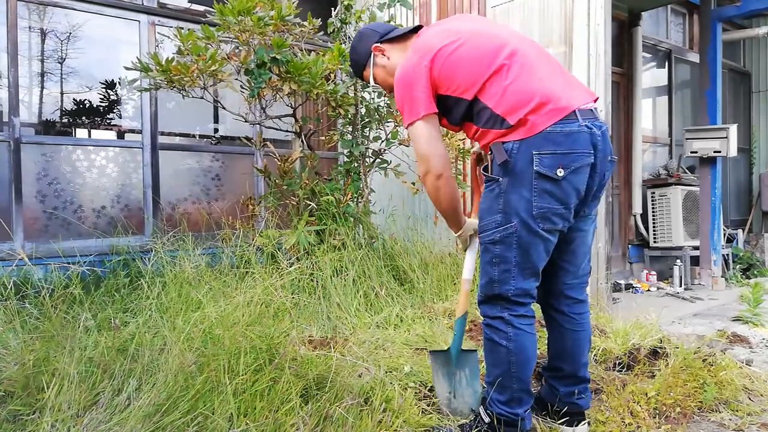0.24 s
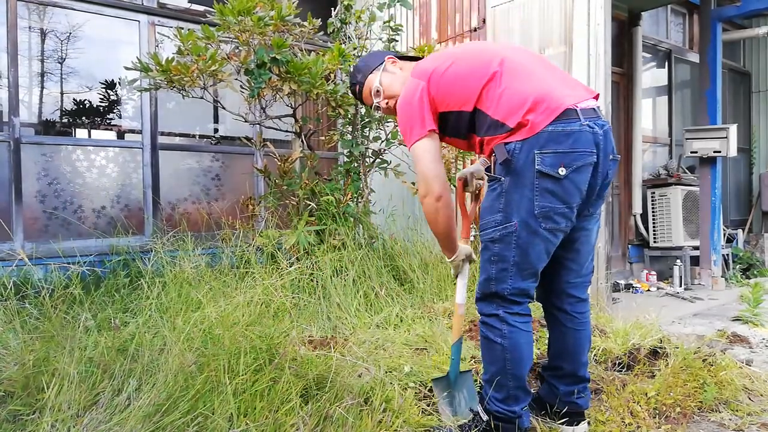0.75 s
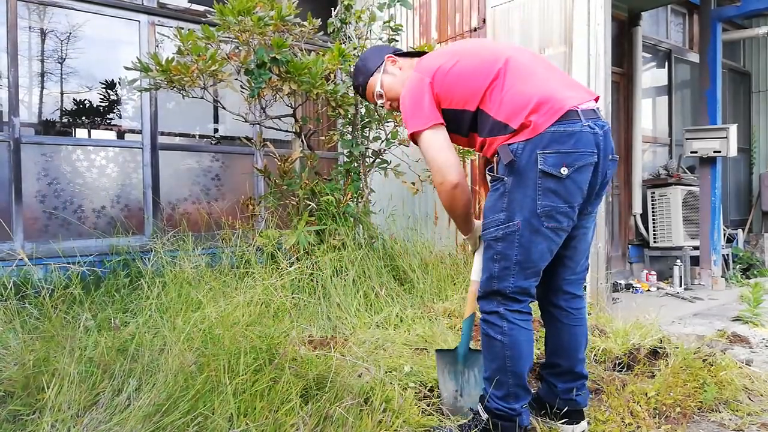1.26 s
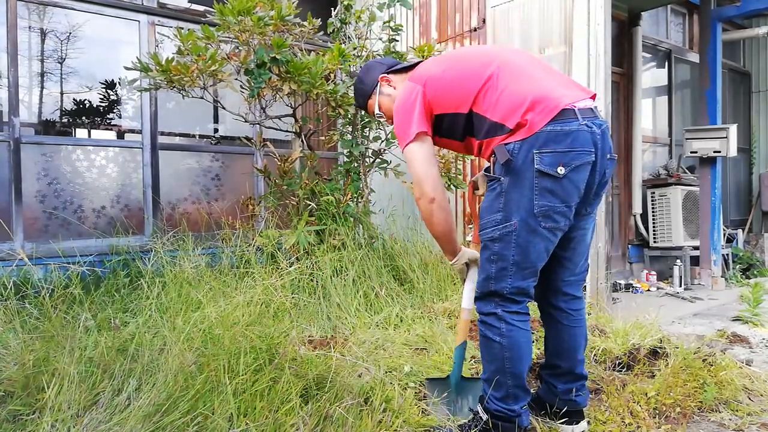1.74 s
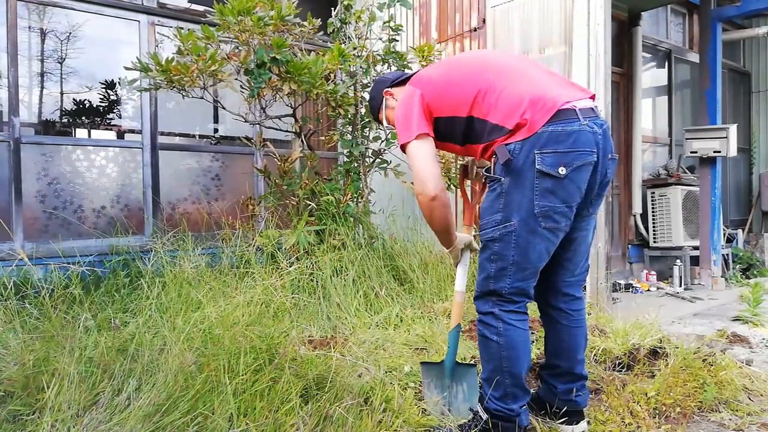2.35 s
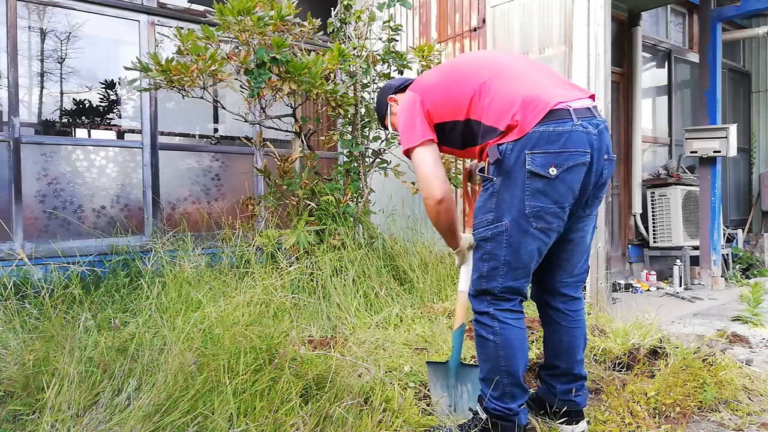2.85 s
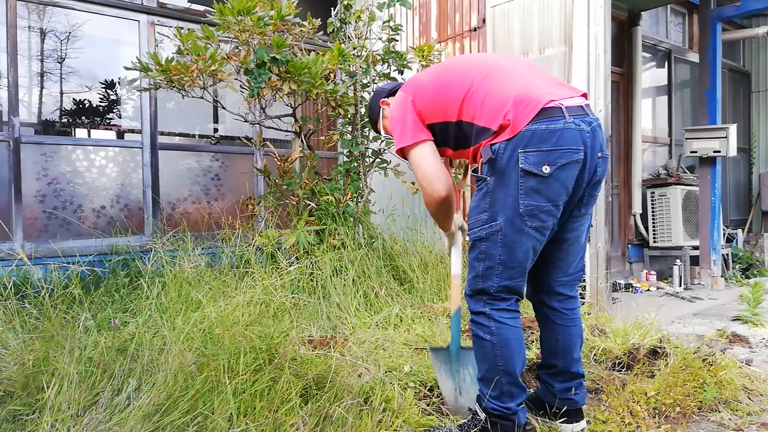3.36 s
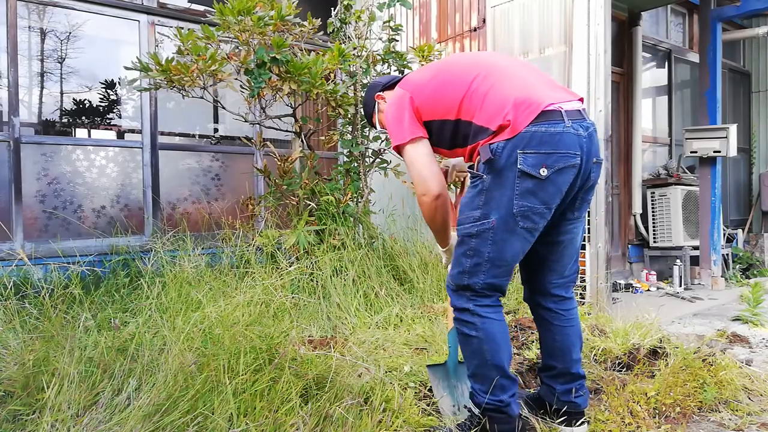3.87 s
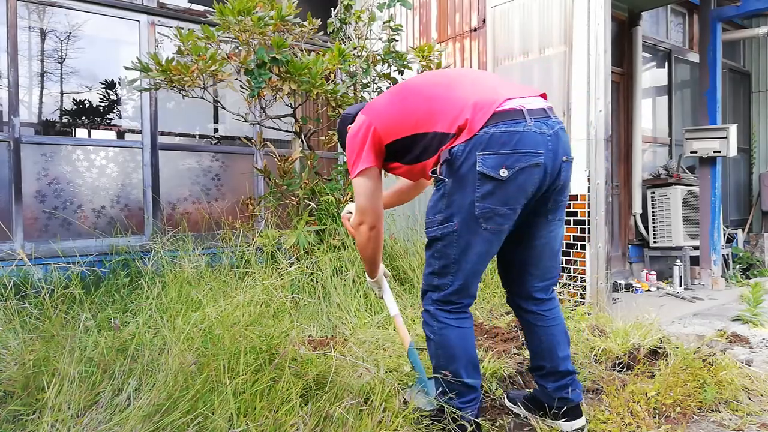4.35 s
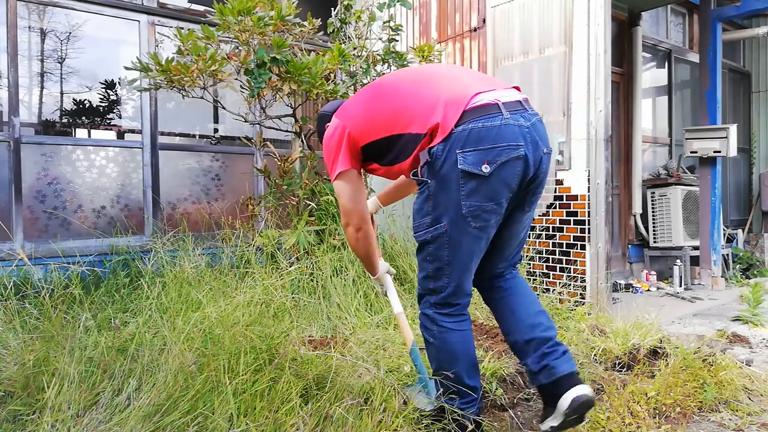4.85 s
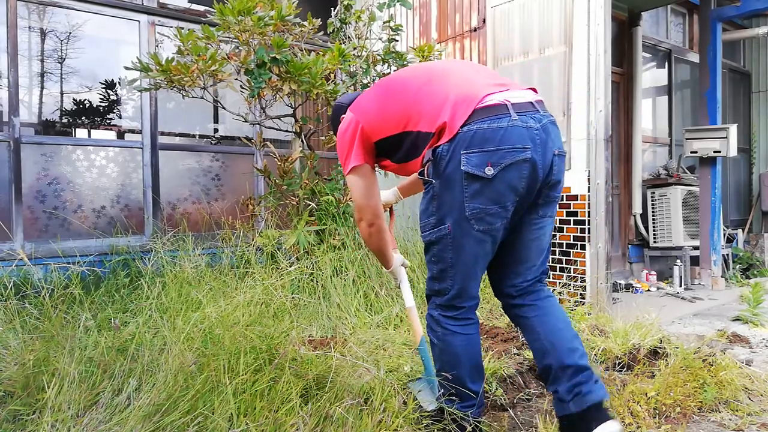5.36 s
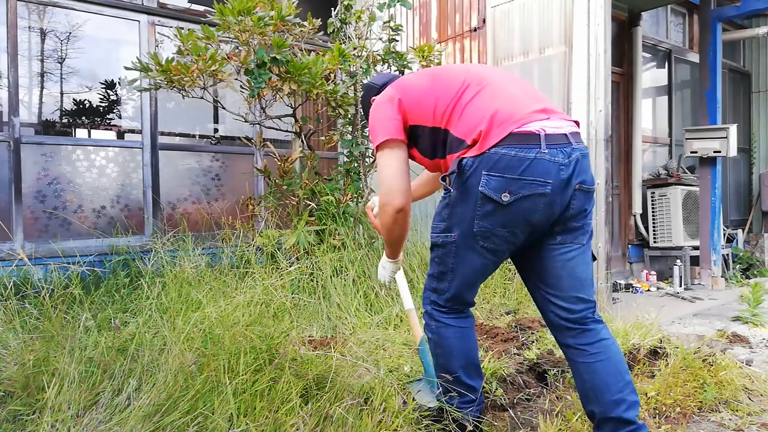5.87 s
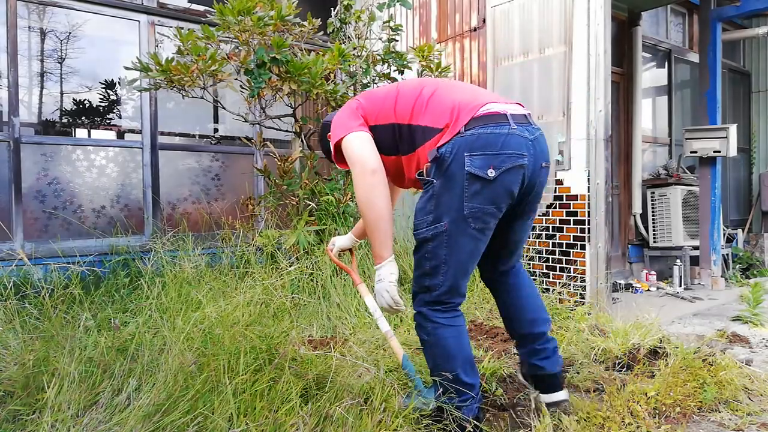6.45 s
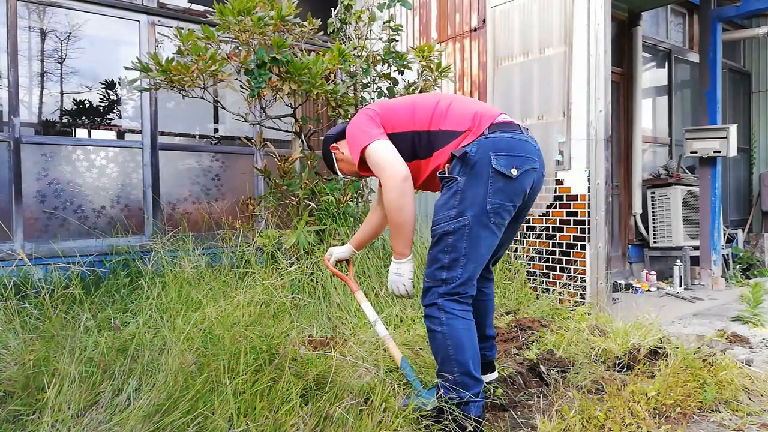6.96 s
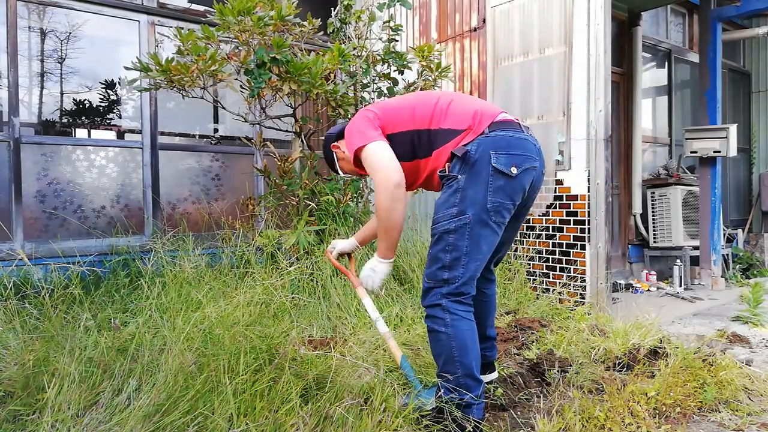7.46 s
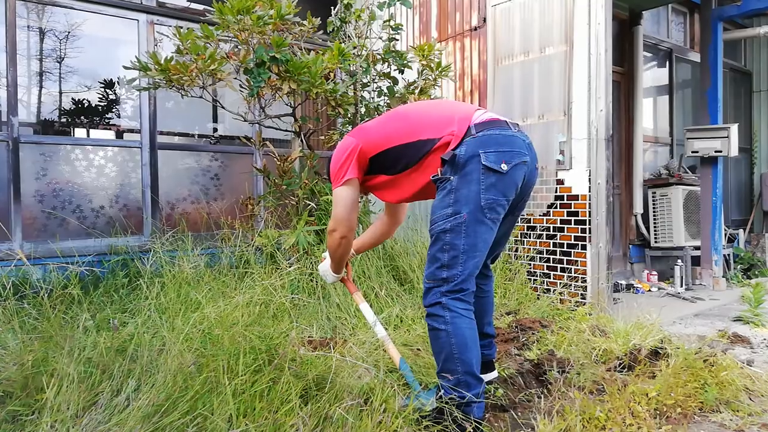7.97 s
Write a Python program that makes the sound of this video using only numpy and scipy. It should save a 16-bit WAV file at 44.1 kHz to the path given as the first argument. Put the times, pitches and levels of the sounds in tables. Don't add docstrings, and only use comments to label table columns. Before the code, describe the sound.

Close outdoors, a steel shovel strikes stony soil with bright, dry cracks and short metallic rings, leaving crumbling grit. Scrapes run between uneven blows. Midway, grass rustles, a boot thumps twice on the tread and a root snaps; then another hard stone hit and lighter scrapes. Crickets chirp over soft air noise and a low wavering hum.

```python
import sys
import numpy as np
from scipy import signal
from scipy.fft import rfft, irfft, next_fast_len
from scipy.io import wavfile
from scipy.ndimage import uniform_filter1d, map_coordinates

SR = 44100
rng = np.random.default_rng(int(sys.argv[2]) if len(sys.argv) > 2 else 0)


def inscribe(sig):
    pcm = np.round(np.clip(np.atleast_2d(sig).T, -1, 1) * 32767)
    wavfile.write(sys.argv[1], SR, pcm.astype(np.int16))


def invert_db(x):
    u = np.asarray(x, float) / 20
    return 10 ** u


N = 362061
NEAR_LAG_SAMPLES = 2


def unit(x):
    return x / np.sqrt(np.mean(x ** 2) + 1e-20)


def along(points, hz):
    f, v = np.transpose(points)
    return np.interp(np.log(hz + 1), np.log(f + 1), v)


def curve(rows):
    s, value = np.transpose(rows)
    return np.interp(np.arange(N) / SR, s, value)


def filtered(x, response):
    m = next_fast_len(N + 8192)
    return irfft(rfft(x, m) * response(np.fft.rfftfreq(m, 1 / SR)), m)[..., :N]


def add(out, s, piece):
    i = round(s * SR)
    out[:, max(i, 0):max(i + piece.shape[1], 0)] += piece[:, max(-i, 0):N - i]


def echoes(x, t60_s, apart):
    decay = invert_db(-60 * np.arange(SR // 4) / SR / t60_s)
    common, *own = rng.standard_normal((3, SR // 4)) * decay
    tail = common + apart * np.array(own)
    tail = tail / np.linalg.norm(tail[0])
    late = np.pad(x, ((0, 0), (300, 0)))
    return signal.fftconvolve(late, tail, axes=1)[:, :x.shape[1]]


def narrow(hz, width_hz, alike):
    noise = rng.standard_normal((2, N))
    mid, side = filtered(noise, lambda f: 1 / (1 + ((f - hz) / width_hz) ** 2))
    return unit(mid + np.sqrt((1 - alike) / (1 + alike)) * side * [[1], [-1]])


def air():
    # Hz, level in dB per Hz.
    spectrum = [(15, -47), (25, -7.5), (64, -12), (96, -3.5), (130, -14), (190, -12.5), (315, -22),
                (470, -27), (1000, -28), (2250, -35), (6000, -41), (10000, -43.5), (15700, -48)]
    # Hz, left-right correlation.
    likeness = [(60, 1), (240, 0.55), (950, -0.44), (3770, 0.12), (15000, 0.052)]

    def mid_side(hz):
        turn = np.arccos(np.clip(along(likeness, hz), -1, 1)) / 2
        return invert_db(along(spectrum, hz)) * [np.cos(turn), np.sin(turn)]

    mid, side = filtered(rng.standard_normal((2, N)), mid_side)
    return invert_db(-53.5) * unit(np.array([mid + side, mid - side]))


def machine():
    # time in seconds, tone level in dB.
    load = [(0.0, -62.5), (0.43, -52.5), (0.77, -65), (1.23, -69), (3.61, -60.5), (4.0, -68), (4.54, -54.5),
            (4.96, -66.5), (5.55, -56), (6.14, -57.5), (6.28, -49.5), (7.31, -69.5), (8.2, -62.5)]
    tone_db = curve(load)
    drone_db = -59.5 + 0.19 * (tone_db - tone_db.mean())
    drone = narrow(105, 37, alike=1.0) + invert_db(-3.5) * narrow(92, 6.4, alike=1.0)
    wander_rad = 0.01185 / 6 * rng.standard_normal(N)
    tone = np.sin(2 * np.pi * np.cumsum(186 / SR + wander_rad))
    return invert_db(drone_db) * drone + invert_db(tone_db + 2) * tone + invert_db(-68.5) * narrow(253, 1.9, alike=1.0)


def far_insect():
    # time in seconds, level in dB.
    level = [(0.0, -63), (0.32, -70.5), (0.82, -64), (2.31, -87.5), (4.0, -81.5), (4.18, -61),
             (5.84, -76.5), (6.21, -74.5), (7.38, -82), (8.2, -86.5)]
    breaks = map_coordinates(rng.standard_normal(400), [np.arange(N) * 32 / SR]).clip(-3, 1)
    return invert_db(curve(level) - 2.5 + 4 * breaks) * narrow(3700, 190, alike=0.073)


def cricket():
    # first pulse in seconds, level in dB, pitch in Hz.
    chirps = [(-.07, -50, 4760), (.298, -64, 4760), (0.504, -48.5, 4740), (0.99, -62, 4780),
              (1.324, -65, 4790), (1.704, -66, 4770), (1.98, -65, 4800), (2.056, -60.5, 4800),
              (2.448, -45.5, 4740), (2.781, -44.5, 4630), (3.27, -66.5, 4760), (3.327, -52, 4750),
              (3.627, -66.5, 4850), (3.909, -62, 4970), (4.299, -62, 4770), (4.391, -73, 4870),
              (4.98, -64, 4800), (5.058, -50.5, 4790), (5.329, -60, 4840), (6.06, -59, 4960),
              (6.285, -57, 4720), (6.62, -66, 4750), (6.673, -51.5, 4770), (6.954, -60, 4740),
              (7.302, -58, 4830), (7.628, -61.5, 4850), (7.709, -65, 4850), (7.954, -50.5, 4760)]
    # delay in seconds, level in dB, length in seconds.
    wing = [
        (0, -9.5, .006),
        (0.025, -5, .0105),
        (0.056, -3, .011),
        (0.077, -1.5, .0115),
    ]
    direct, far = np.zeros((2, N)), np.zeros((2, N))
    for start_s, db, hz in chirps:
        echo_db = -62 + .25 * (db + 55) - db
        for delay_s, stroke_db, length_s in wing:
            pitch, size, *teeth = rng.standard_normal(8)
            t = np.arange(0, length_s, 1 / SR)
            phase = 2 * np.pi * (hz * t - 16000 * t ** 2) * (1 + .008 * pitch) + [[-1.9], [0]]
            tone = np.sin(phase) + invert_db(-14.5) * np.sin(2 * phase)
            uneven_db = 2.2 * size + 2.3 * np.interp(5 * t / length_s, np.arange(6), teeth)
            swell = np.sin(np.pi * (t / length_s) ** 0.83).clip(0) ** 0.6
            stroke = invert_db(db + stroke_db + uneven_db + 9.0) * swell * tone
            stroke_s = start_s + delay_s - length_s / 2
            add(direct, stroke_s, stroke)
            add(far, stroke_s, invert_db(echo_db) * stroke)
    return direct + echoes(far, t60_s=0.28, apart=3)


def grit(colour, share, lag, lumps, patchy_db):
    common, *own = lumps * rng.standard_normal((3, len(lumps)))
    shared = np.array([np.roll(common, lag), common])
    pair = np.sqrt(share) * shared + np.sqrt(1 - share) * np.array(own)
    hz, _, z = signal.stft(pair, SR, nperseg=512)
    field = uniform_filter1d(rng.standard_normal(z.shape[1:]), size=2, axis=0)
    field = uniform_filter1d(field, size=12, axis=1)
    z = z * invert_db(along(colour, hz)[:, None] + patchy_db * unit(field))
    return unit(signal.istft(z, nperseg=512)[1][:, :N])


def contact_noise(shares, lag, spike_db, patchy_db):
    # Hz, level in dB per Hz.
    body = [(210, -44.5), (350, -4), (388, -4.5), (728, -8), (1610, -6), (2300, -9), (2990, -34),
            (5060, -120)]
    # Hz, level in dB per Hz.
    rasp = [(1060, -40.5), (1800, -16.5), (1970, -0.5), (3780, 2.5), (4610, 1.5), (6500, -0.5), (8450, -38),
            (14300, -120)]
    # Hz, level in dB per Hz.
    rustle = [(2650, -36), (4500, -11), (6740, -5.5), (7450, 0), (11100, 2), (12300, -0.5), (15800, -11)]
    lumps = invert_db(spike_db * unit(uniform_filter1d(rng.standard_normal(N + 512), size=200)))
    breaks = (rng.random(N + 512) < 120 / SR) * rng.exponential(0.61, N + 512)
    lumps = lumps * (1 + signal.lfilter([1], [1, -np.exp(-1 / (0.000092 * SR))], breaks))
    ranges = zip((body, rasp, rustle), shares)
    return [grit(colour, share, lag, lumps, patchy_db) for colour, share in ranges]


def scrape():
    # peak in seconds, level in dB, brightness in dB, rise in seconds, fall in seconds.
    drags = [(.306, -60.5, 7, 0.05, 0.098), (.6, -62, 6, 0.056, .1), (0.647, -37.5, 8.5, 0.047, 0.063),
             (.8, -56.5, 12, 0.057, 0.25), (1.225, -48, 11.5, 0.12, 0.12), (1.24, -53, 6, 0.087, 0.074),
             (1.375, -60.5, 7, 0.02, 0.091), (1.505, -42, 20, 0.035, 0.072), (1.535, -41.5, 8, 0.051, 0.4),
             (1.574, -35.5, 9, 0.028, 0.07), (1.62, -37, 5.5, 0.03, 0.051), (1.896, -62.5, 4, 0.079, 0.095),
             (2.155, -61.5, 2, 0.06, 0.13), (2.584, -68.5, 2.5, 0.12, .12), (3.194, -64, 3.5, 0.11, 0.066),
             (5.78, -63, -8, 0.12, 0.068), (6.135, -66, -1, .025, .07), (6.229, -56, 1.5, 0.0091, 0.08),
             (6.992, -55.5, 9, .01, 0.067), (7.101, -76.5, 0.5, .2, 0.29), (7.51, -62, 4, 0.014, 0.12),
             (7.796, -55, 12, .015, 0.033), (7.815, -42.5, 10.5, .012, 0.087)]
    swishes = [(3.93, -60.5, 15, 0.1, .15), (4.005, -51.5, 18.5, .015, .1), (4.065, -43, 20, 0.13, 0.18),
               (4.135, -47.5, 16.5, 0.13, 0.037), (4.212, -52, 17, 0.013, 0.16),
               (4.3, -50.5, 18, .1, 0.084), (4.5, -60, 6.5, 0.32, .15), (4.66, -52.5, 5.5, .02, 0.069),
               (4.75, -62.5, 6.5, 0.2, 0.5), (5.146, -46, 16.5, 0.073, .14), (5.3, -57.5, 14, 0.13, 0.24),
               (5.464, -45.5, 7, 0.029, .12), (5.6, -55, 43, 0.17, 0.27), (5.712, -51, 39, 0.055, 0.13),
               (6.1, -63.5, 7.5, 0.63, 0.56), (6.415, -48, 21.5, 0.15, 0.12),
               (6.505, -53.5, 22, 0.076, 0.11), (5.77, -57, 36, 0.036, 0.04), (4.88, -63.5, 23, .12, 0.13),
               (6.74, -63, 5.5, 0.38, 0.11), (7.394, -56.5, 11, .08, 0.1),
               (8.054, -48, 20.5, 0.0081, 0.071), (8.2, -73, 4, 0.205, .2)]
    drop_db, roundness = 26, 1.14
    force = np.zeros((3, N))
    for s, db, bright_db, rise_s, fall_s in drags + swishes:
        t = np.arange(-2 * rise_s, 2 * fall_s, 1 / SR)
        away = np.where(t < 0, -t / rise_s, t / fall_s)
        stroke = invert_db(db - drop_db * away ** roundness)
        add(force, s + t[0], invert_db([[3.0 - bright_db], [2 - 0.57 * bright_db], [1]]) * stroke)
    noise = contact_noise((.5, .25, .2), lag=24, spike_db=1.5, patchy_db=2.0)
    return np.sum(force[:, None] * noise, axis=0)


def stamps():
    # time in seconds, level in dB, pitch in Hz, width in seconds.
    pushes = [
        (5.144, -11, 188, 0.0021),
        (5.169, -26, 200, 0.0028),
        (5.471, -7, 199, 0.0014),
    ]
    out = np.zeros((2, N))
    u = np.arange(-.02, .02, 1 / SR)[None]
    for s, db, hz, width_s in pushes:
        swing = np.cos(2 * np.pi * hz * u) - np.exp(-.5 * (2 * np.pi * hz * width_s) ** 2)
        add(out, s - .02, -invert_db(db) * np.exp(-.5 * (u / width_s) ** 2) * swing)
    return out


def rings():
    # time in seconds, Hz, level in dB.
    knocks = [(0.016, 298, -19.5), (0.017, 474, -29), (0.608, 412, -35.5), (0.635, 322, -38),
              (1.56, 325, -34), (1.83, 423, -46), (2.168, 343, -41), (2.167, 249.5, -39), (2.17, 445, -44),
              (2.853, 255, -21.5), (2.855, 290, -19), (2.853, 446, -19), (2.853, 748, -26),
              (3.427, 304, -22), (3.426, 423, -24), (3.46, 366, -20.5), (4.65, 330, -43), (5.153, 253, -22),
              (5.14, 622, -42), (5.466, 715, -36), (5.32, 439, -46.5), (5.354, 398, -42.5),
              (5.483, 251, -16), (6.13, 386, -47), (6.784, 371, -22), (6.808, 142, -37.5),
              (7.378, 408, -40.5), (7.405, 427, -49), (7.83, 375, -40.5)]
    # time in seconds, Hz, level in dB.
    clinks = [(.0175, 10600, -5), (.0195, 10500, -8), (.018, 9100, -15), (.018, 1500, -17),
              (.04, 3500, -24), (1.5425, 4700, -17), (1.195, 7700, -42), (1.2, 2870, -45),
              (1.214, 10900, -33), (1.225, 2850, -43), (1.25, 3750, -40), (1.36, 3000, -48),
              (1.37, 4300, -44), (1.372, 2700, -46), (1.558, 1900, -23), (1.617, 3700, -28),
              (1.64, 2750, -35), (1.862, 3000, -47), (2.8545, 1620, -8), (2.858, 1750, -14),
              (2.856, 3800, -17), (2.855, 4760, -12), (2.858, 10400, -18), (3.426, 10600, -7),
              (3.431, 11000, -7), (3.463, 10500, -18), (3.472, 10500, -21), (4.656, 2000, -38),
              (5.465, 1880, -32), (6.14, 2700, -53), (6.17, 2200, -53), (6.226, 3900, -43),
              (6.228, 2300, -48), (6.249, 3700, -47), (6.31, 2050, -45), (6.435, 1800, -52),
              (6.545, 1700, -54), (6.787, 2100, -30), (6.788, 4850, -12), (6.786, 7300, -16),
              (6.787, 10300, -14)]
    # time in seconds, Hz, level
    # in dB.
    chimes = [(0.022, 1403, -27.5), (.018, 3320, -31.5), (1.213, 1500, -51), (1.25, 1420, -49),
              (1.367, 1430, -55), (1.365, 2030, -60), (2.166, 1406, -41), (2.865, 1530, -32.5),
              (5.83, 97, -45), (5.895, 91, -40), (6.26, 96, -42), (2.855, 3660, -34.5), (3.43, 1430, -32),
              (3.433, 2900, -32.5), (6.79, 870, -37.5), (6.791, 1570, -38.5), (6.79, 3320, -30)]
    # time in seconds, Hz, level in dB.
    sings = [(.29, 1444, -58.5), (1.148, 1420, -60), (1.362, 1410, -65), (1.9, 1410, -64),
             (2.47, 1403, -69), (3.5, 2900, -54)]
    # time in seconds, level in dB.
    snaps = [(4.008, -46), (4.4, -38), (4.465, -49), (4.52, -54), (5.7696, -30), (5.7828, -26),
             (5.7998, -22), (5.466, -17.5), (6.31, -52)]
    modes = []
    for rows, t60_s in ((sings, 0.6), (clinks, 0.025), (chimes, 0.24)):
        modes += [(*row, t60_s) for row in rows]
    modes += [(s, hz, db, 0.074 * 2 ** (-(db + 30.0) / 19)) for s, hz, db in knocks]
    modes += [(s, 1700, db, .005) for s, db in snaps]
    out = np.zeros((2, N))
    for s, hz, db, t60_s in modes:
        steps, knots = rng.standard_normal(SR // 2), rng.standard_normal(64)
        t = np.arange(0, min(1.2 * t60_s, .49), 1 / SR)
        drift = .045 * np.sqrt(hz / 1000) * np.cumsum(steps[:len(t)])
        flutter_db = 4.5 * np.interp(t * 70, np.arange(64), knots) * np.minimum(t * 50, 1)
        phase = 2 * np.pi * hz * (t - [[NEAR_LAG_SAMPLES / SR], [0]]) + drift
        onset = 1 - np.exp(-t / 0.001)
        add(out, s, invert_db(db + flutter_db - 60 * t / t60_s) * onset * np.sin(phase))
    return out


def strikes():
    # time in seconds, peak in dB, body in dB, brightness in dB,
    # crunch in dB over the peak.
    stone_blows = [(0.0184, -5.5, -13.5, -12, -3.5), (0.6106, -18, -27, -10.5, 1),
                   (0.636, -25, -12, -12, -4), (1.2496, -28, -45, -21, 0), (1.543, -10, -27, -12, -7),
                   (1.559, -15, -18, -21, -6), (1.6156, -22, -16, -16, -9), (2.168, -19.5, -28, -11.5, 8),
                   (2.857, -4, -14, -14, -2), (3.4271, -6, -15, -10, -4.5), (3.4618, -15, -5, -27.5, -6.5),
                   (4.6558, -28, -23, -39, 2.5), (6.786, -5.5, -31, -8.5, -5.5),
                   (6.8078, -15.5, -19.5, -11.5, 1.5), (7.8233, -23.5, -18, -8, 1),
                   (7.848, -39, -8, -27, 0), (8.054, -31, -13, -24, -23)]
    # time in seconds, peak in dB, brightness in dB.
    pebbles = [(0.743, -51, 8), (0.7515, -52, 8), (.7868, -54, 8), (.919, -55.5, 6), (1.152, -49, 3),
               (1.4674, -55, 5), (4.0194, -38, 0), (4.139, -38.5, 1), (4.18, -40, 0), (4.2569, -44, 0),
               (4.418, -54, 0), (4.483, -50, 0), (4.728, -44, -9), (4.9987, -52, 2), (5.1229, -42, 5),
               (5.4367, -50, 4), (5.8385, -58, 2), (5.8972, -52, 3), (5.953, -56, 3), (6.0915, -46, -6),
               (6.2345, -37, -18), (8.0595, -48, 4), (8.207, -58, 2.5), (0.8035, -34.5, 1),
               (0.834, -40, 1.5), (0.8605, -42, 5), (1.125, -44.5, 2), (1.37, -38, -8.5), (1.4903, -31, -9),
               (1.559, -30, -15), (1.6911, -50, 4), (1.86, -32.5, -30.5), (2.283, -39, -16),
               (2.588, -41.5, -12.5), (3.184, -41, -9), (3.998, -32.5, -10.5), (4.1967, -29, -2),
               (4.2083, -31, -8), (5.139, -25.5, -0.5), (5.322, -23.5, -14), (5.449, -49, 12),
               (5.4656, -20, -10), (1.717, -67, -3), (5.109, -43, 3), (5.9836, -30, -13),
               (6.2267, -35, -18), (6.3093, -28.5, -31), (6.988, -32, -10), (7.3512, -52, -2),
               (7.389, -39.5, -3), (7.5118, -36, -11.5), (8.1718, -47, -7)]
    # time in seconds, peak in dB, brightness in dB.
    cracks = [(0.023, -14.5, -13), (0.0276, -17.5, -21), (0.6197, -21, -4), (.649, -23, -12),
              (1.2127, -33, -1), (1.2185, -31, 1), (1.538, -21, -11), (1.581, -24, -17), (1.6235, -21, -14),
              (1.628, -24, -14), (2.1696, -27, -11), (2.173, -24, -13), (2.186, -18, -12),
              (2.8613, -13.5, -15), (2.8657, -18, -10), (3.432, -8.5, -10.5), (3.4338, -14, -9.5),
              (3.4735, -24.5, -11), (6.79, -9, -13), (6.8045, -19, -12.5), (6.812, -16.5, -15),
              (7.8272, -28.5, -8)]
    settle_t60_s, settle_db, settle_dull_db = 0.71, -24, -9.5
    force = np.zeros((3, 1, N))
    blows = [(*blow, .2, .0025) for blow in stone_blows]
    ticks = [(s, db, -16.5, bright_db, -16, .06, .0015) for s, db, bright_db in pebbles + cracks]
    for s, db, body_db, bright_db, crunch_db, t60_s, contact_s in blows + ticks:
        t = np.arange(-.008, 2 * t60_s, 1 / SR)
        crack = np.exp(-((t - .001) / np.where(t < .001, .0012, contact_s)) ** 2)
        cut_in_db = 8000 * np.minimum(t + .002, 0)
        crunch = invert_db(crunch_db - 60 * np.maximum(t, 0) / t60_s + cut_in_db)
        settle = invert_db(crunch_db + settle_db - 60 * t / settle_t60_s + cut_in_db)
        tones_db = (body_db + 8.0, 0, bright_db + 16.0)
        for layer, tone_db, dull_db in zip(force, tones_db, (0, 0, settle_dull_db)):
            push = crack + crunch + invert_db(dull_db) * settle
            add(layer, s - .008, invert_db(db - 20 + tone_db) * push[None])
    grains = contact_noise((.8, .4, .3), NEAR_LAG_SAMPLES, spike_db=0.74, patchy_db=2.5)
    noise = np.sum(force * grains, axis=0)
    return filtered(noise, lambda hz: 1 / (1 + (hz / 14000) ** 11))


def blade(x):
    # centre in Hz, width in Hz, level in dB.
    resonances = [(1478, 59, 3.5), (2056, 56, -4), (2870, 41, 0), (3560, 60, -7), (4580, 370, -4.5),
                  (6820, 260, -2.5), (7440, 170, -5.5), (9360, 150, -2), (10470, 420, 1.5), (10800, 90, -3)]

    def response(f):
        total = 1
        for centre, width, db in resonances:
            total = total + invert_db(db) * 1j * f * width / (centre ** 2 - f * f + 1j * f * width)
        return total

    return filtered(x, response)


def scene():
    contact = strikes() + scrape()
    free_blade = np.arange(N) < 3.8 * SR
    shovel = blade(contact * free_blade) + invert_db(1.0) * contact * ~free_blade
    hits = rings() + stamps()
    hits = hits + invert_db(-12.5) * echoes(hits, t60_s=0.25, apart=0.74)
    return shovel + hits + cricket() + air() + machine() + far_insect()


def low_pass(x):
    return signal.sosfilt(signal.butter(12, 16660, fs=SR, output="sos"), x)


def record(dry):
    # Hz, left-right difference in dB.
    ports = [(60, -.5), (550, 1.5), (1650, -1), (3200, -3.5), (4900, -2), (8000, 0.5), (10500, 4.5),
             (13000, -3.5)]

    def port_response(hz):
        cavity_db = 4 / (1 + ((hz - 10600) / 1200) ** 2)
        return invert_db(cavity_db + along(ports, hz) * [[.5], [-.5]])

    coloured = filtered(dry, port_response)
    rounded = coloured / (1 + np.abs(coloured / .82) ** 6) ** (1 / 6)
    return low_pass(filtered(rounded, lambda hz: 1 / (1 + (hz / 15800) ** 80)))


dry = scene()
out = record(dry)
inscribe(out)
```